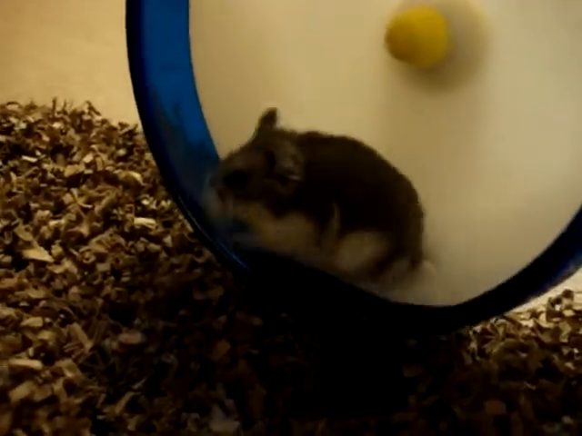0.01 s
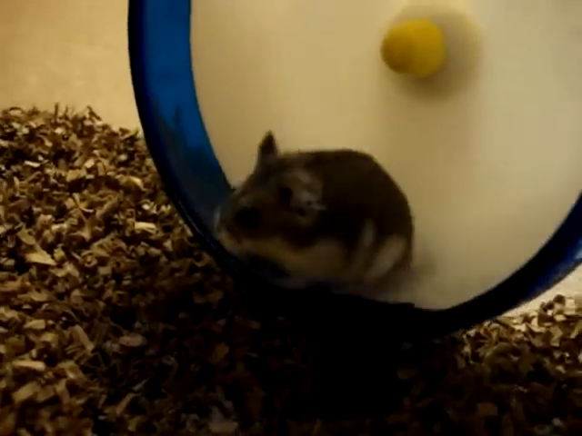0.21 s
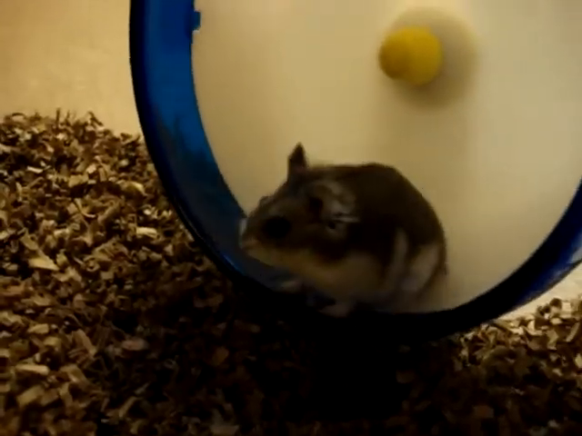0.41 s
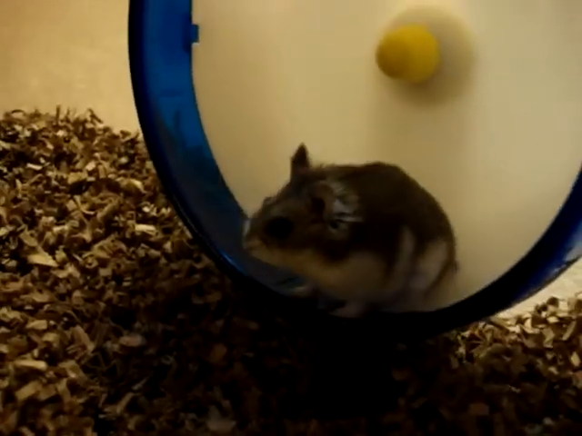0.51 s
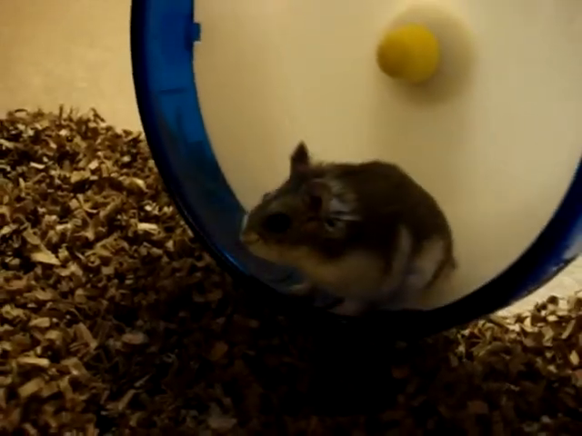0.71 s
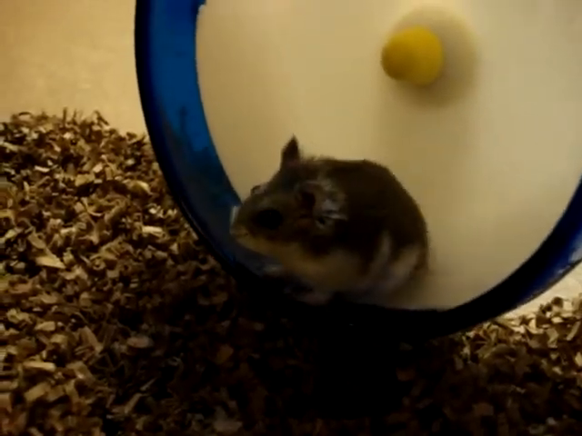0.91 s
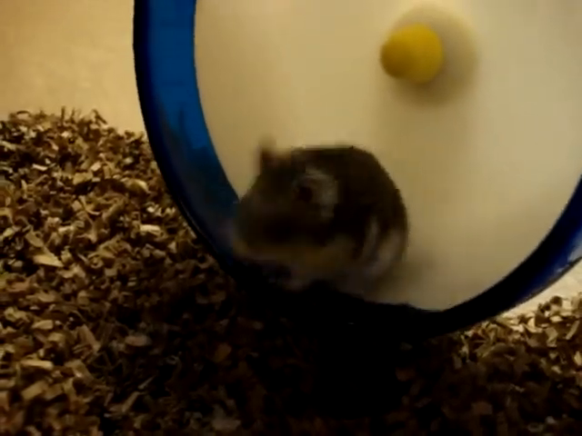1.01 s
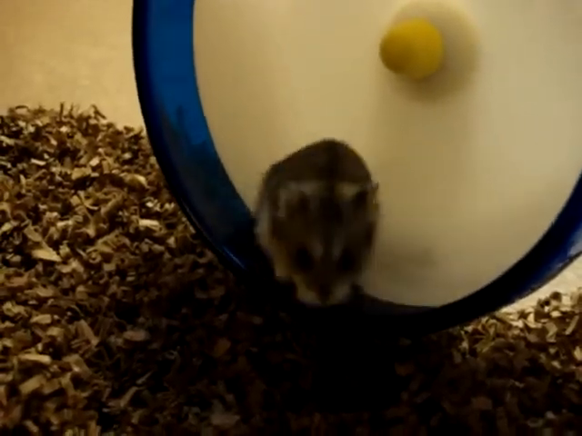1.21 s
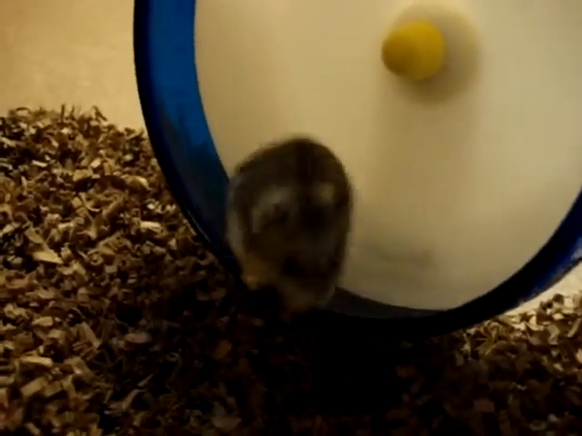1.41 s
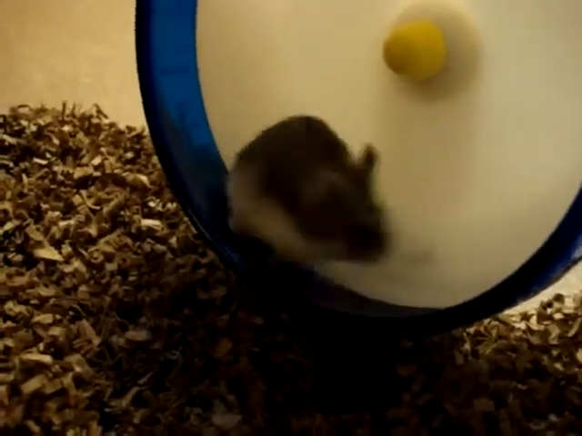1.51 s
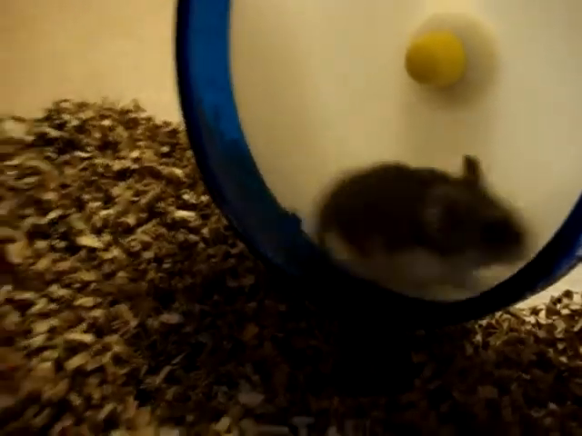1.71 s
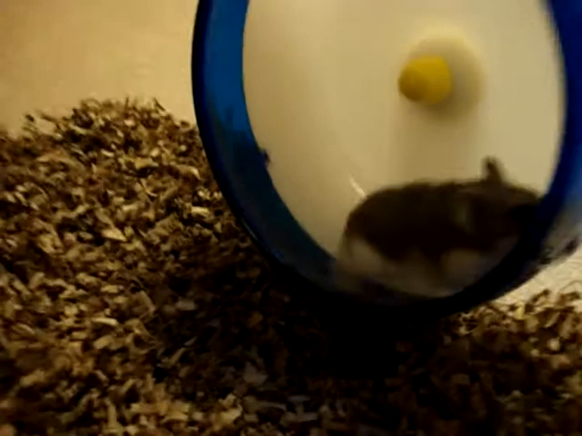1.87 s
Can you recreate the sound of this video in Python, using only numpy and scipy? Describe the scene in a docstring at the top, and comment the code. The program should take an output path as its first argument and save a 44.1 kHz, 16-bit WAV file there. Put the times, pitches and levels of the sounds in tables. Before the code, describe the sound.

A hamster's plastic exercise wheel clacks, heard close up in a small room. Soft hollow thumps come at the start and near 0.17 seconds, then a dull knock at 0.22 and a loud, bright chattering clack at 0.27 with a short room tail. Low hiss remains, with a tiny tick at 0.8 and faint thump at 1.14. From 1.6, light thumps and ticks join a swelling, humming rub.

```python
"""Indoors, close to the microphone: a hamster shifts its weight in a small plastic exercise wheel.
Paw and drum thumps are one decaying sine plus a dull noise thud; claw ticks are short noise bursts.
The loose wheel knocks, then clacks on its axle: chattering noise cracks, plastic modes, a low bump.
Near the end the animal turns round and the wheel's rub and roll, friction noise with a drum hum, swells.
Room hiss is filtered noise; its upper part dips briefly around the first knock, returning with the clack."""
import sys
import numpy as np
from scipy import signal
from scipy.fft import rfft, irfft
from scipy.io import wavfile

SR = 44100
rng = np.random.default_rng(int(sys.argv[2]) if len(sys.argv) > 2 else 0)


def store_wav(level_fs):
    """Save 16-bit WAV to argv[1]."""
    pcm = np.round(np.clip(np.atleast_2d(level_fs), -1, 1) * 32767)
    wavfile.write(sys.argv[1], SR, pcm.T.astype(np.int16))


N = 83790
T = np.arange(N) / SR


def undb(db):
    """Decibels to amplitude gain."""
    return 10 ** (np.asarray(db) / 20)


def unit(x):
    """Scale to rms 1."""
    return x / np.sqrt(np.mean(x ** 2))


def level_curve(points):
    """Gain over time from (seconds, dB) points, joined linearly in dB."""
    seconds, db = np.array(points, float).T
    return undb(np.interp(T, seconds, db))


def colour(x, points):
    """Filter by a spectrum of (Hz, dB) points, joined over log frequency; rms 1."""
    point_hz, point_db = np.array(points, float).T
    bin_hz = np.maximum(np.fft.rfftfreq(N, 1 / SR), 1)
    gain_db = np.interp(np.log(bin_hz), np.log(point_hz), point_db)
    return unit(irfft(rfft(x) * undb(gain_db), N))


def noise(points):
    """Coloured Gaussian noise of rms 1."""
    return colour(rng.standard_normal(N), points)


def lowpass(x, hz, order):
    """Butterworth low-pass."""
    return signal.sosfilt(signal.butter(order, hz, fs=SR, output="sos"), x)


def split(x, hz):
    """Zero-phase parts below and above a frequency; they sum to x."""
    bin_hz = np.fft.rfftfreq(N, 1 / SR)
    low = irfft(rfft(x) / (1 + (bin_hz / hz) ** 8), N)
    return low, x - low


def burst(start_s, attack_s, t60_s):
    """Envelope: linear attack times an exponential decay, both from the start."""
    attack = np.clip((T - start_s) / attack_s, 0, 1)
    return attack * np.exp(-np.log(1000) * np.maximum(T - start_s, 0) / t60_s)


def ring(start_s, hz, attack_s, t60_s):
    """One struck mode: a decaying sine."""
    return burst(start_s, attack_s, t60_s) * np.sin(2 * np.pi * hz * (T - start_s))


# Hiss spectrum. Each row: frequency in Hz, relative density in dB per Hz.
HISS_SPECTRUM = [(15, -49), (25, -17), (32, -10), (113, -1.5), (156, 0.5), (239, -1), (292, -3.5),
                 (482, -5.5), (836, -9), (901, -7.5), (1070, -9.5), (3580, -16.5), (10000, -24),
                 (13000, -108), (22000, -120)]
# Brief dip of the upper hiss. Each row: time in seconds, gain in dB.
HISS_DIP = [(.197, 2.5), (.203, -34), (.262, -34), (.29, 1)]
HISS_DB, DIP_ABOVE_HZ = -52.5, 440


def hiss():
    """Steady room noise; its upper part dips briefly."""
    low, high = split(noise(HISS_SPECTRUM), DIP_ABOVE_HZ)
    return undb(HISS_DB) * (low + high * level_curve(HISS_DIP))


# Rubbing of the turning wheel. Each row: time in seconds, level in dB.
ROLL_LEVEL = [(0, -59), (.15, -67.5), (.3, -90), (1.0, -73), (1.5, -67), (1.68, -60.5), (1.78, -57),
              (1.9, -51.5)]
# Friction spectrum. Each row: frequency in Hz, relative density in dB per Hz.
RUB_SPECTRUM = [(150, 12), (400, 11), (1000, -5.5), (2000, 4.5), (4000, 4.5), (7000, 4.5), (10000, -18)]
DRUM_HZ, DRUM_WIDTH_HZ = 736, 81
DRUM_RE_RUB_DB = 3


def rolling():
    """Axle friction as noise, which also drives one drum resonance into a hum."""
    friction = rng.standard_normal(N)
    rub = colour(friction, RUB_SPECTRUM)
    b, a = signal.iirpeak(DRUM_HZ, DRUM_HZ / DRUM_WIDTH_HZ, fs=SR)
    hum = unit(signal.lfilter(b, a, friction))
    return (rub + undb(DRUM_RE_RUB_DB) * hum) * level_curve(ROLL_LEVEL)


# Soft thumps of paws and of the rocking drum. Each row: start in seconds, ring level in dB,
# pitch in Hz, ring t60 in seconds, thud rms in dB relative to half the ring amplitude.
THUMPS = [(.003, -29, 802.4, .08, -8), (.0075, -28, 792.4, 0.13, -6.5), (.0205, -27, 781.5, .06, -23),
          (.105, -51.5, 780, 0.13, -18), (.159, -43, 760, 0.049, -4), (.171, -39, 960, 0.039, -19),
          (.1735, -26, 723, 0.052, -19), (.2318, -15, 777, 0.049, -10), (.2485, -20, 791, 0.033, -20),
          (.263, -23.5, 760, 0.032, -10), (.287, -16, 769, 0.078, -8.5), (1.137, -41, 820, 0.025, -5),
          (1.632, -41.5, 766, 0.14, 2), (1.728, -34, 780, 0.015, 3), (1.7307, -24, 840, 0.013, -9),
          (1.7365, -31.5, 760, 0.047, -11), (1.8215, -34.5, 773, 0.046, 0), (1.853, -44, 760, 0.13, -15),
          (1.893, -44, 920, .05, -12)]
# Thud spectrum. Each row: frequency in Hz, relative density in dB per Hz.
THUD_SPECTRUM = [(100, -26), (250, 8), (400, 0), (520, -5), (750, 12), (1000, 6.5), (1500, -5.5),
                 (2500, -10), (5000, -45), (10000, -53)]
PAW_PUSH_S, THUD_T60_S = 0.00094, 0.06


def thumps():
    """Soft blows ring only the drum's main mode, pitched by where the weight rests, with a dull thud."""
    thud_noise = noise(THUD_SPECTRUM)
    out = np.zeros(N)
    for start_s, ring_db, hz, t60_s, thud_db in THUMPS:
        mode = ring(start_s, hz, PAW_PUSH_S, t60_s)
        thud = thud_noise * burst(start_s, PAW_PUSH_S, THUD_T60_S)
        out += undb(ring_db) * (mode + undb(thud_db) * thud / 2)
    return out


# Knocks of the wheel on its axle. Each row: start in seconds, ring level in dB, crack level in dB,
# bump level in dB, low-pass corner in Hz, share of the free decay time.
KNOCKS = [(0.2248, -19.5, -17, -64, 1860, 0.57), (.2701, -17.5, -10, -21, 14200, 1.)]
# Quick contacts within one knock. Each row: delay in seconds, level in dB.
BOUNCES = [(0, -0.5), (.0034, -0.5), (.0049, -0.5), (.0082, -4.5), (0.0117, -9)]
# Crack spectrum. Each row: frequency in Hz, relative density in dB per Hz.
CRACK_SPECTRUM = [(40, -17.5), (130, -28), (300, -24.5), (520, -19.5), (750, -2), (1050, -12),
                  (1400, -10.5), (1900, -11), (2600, -6), (3500, -0.5), (4600, -0.5), (6800, -0.5),
                  (8300, -6), (10000, -16)]
# Modes of the plastic wheel. Each row: frequency in Hz, relative level in dB, free t60 in seconds.
WHEEL_MODES = [(400, -13, .13), (712, -3, .1), (763, -2, .09), (797, -5, .09), (990, -4, .1),
               (1414, -2, .115), (1588, -9, .1), (1954, -14, .11), (2462, -6, .075), (2585, -7, .07),
               (2870, -10, .07), (3380, -2, .06), (3550, 3, .058), (3838, -2, .06), (4060, -3, .06),
               (4585, 4, .04), (4742, 1, .04), (5228, 0, .033), (5645, -2, .03), (6510, -2, .025),
               (6862, 0, .025)]
CRACK_ATTACK_S, RING_RISE_S = 0.00036, 0.0049
CRACK_FREE_T60_AT_1KHZ_S, CRACK_T60_SLOPE = 0.12, 0.79  # t60 falls as Hz ** -slope
CRACK_BAND_EDGES_HZ = 1000 * 2 ** np.arange(0, 4.1, .5)
BUMP_HZ, BUMP_RISE_S, BUMP_T60_S = 36.5, .003, 0.055


def chatter(start_s, t60_s):
    """Envelope of the quick contacts, added in power."""
    power = 0
    for delay_s, db in BOUNCES:
        power = power + (undb(db) * burst(start_s + delay_s, CRACK_ATTACK_S, t60_s)) ** 2
    return np.sqrt(power)


def crack(start_s, decay_share):
    """Chattering contact noise in bands, the treble dying first."""
    rest = unit(np.tanh(0.7 * noise(CRACK_SPECTRUM)))  # tanh flattens the peaks
    out = np.zeros(N)
    for edge_hz in CRACK_BAND_EDGES_HZ:
        band, rest = split(rest, edge_hz)
        free_t60_s = CRACK_FREE_T60_AT_1KHZ_S * (edge_hz / 1000) ** -CRACK_T60_SLOPE
        out += band * chatter(start_s, decay_share * free_t60_s)
    return out


def wheel_ring(start_s, decay_share):
    """The struck wheel's plastic modes, each a decaying sine."""
    return sum(undb(db) * ring(start_s, hz, RING_RISE_S, decay_share * free_t60_s)
               for hz, db, free_t60_s in WHEEL_MODES)


def knocks():
    """The hub chatters on the axle: cracks and wheel modes, with a low bump under the clack."""
    out = np.zeros(N)
    for start_s, ring_db, crack_db, bump_db, dull_hz, decay_share in KNOCKS:
        out += undb(crack_db) * lowpass(crack(start_s, decay_share), dull_hz, order=1)
        out += undb(ring_db) * lowpass(wheel_ring(start_s, decay_share), dull_hz, order=2)
        out += undb(bump_db) * ring(start_s, BUMP_HZ, BUMP_RISE_S, BUMP_T60_S)
    return out


# Claw ticks. Each row: start in seconds, level in dB, t60 in seconds.
TICKS = [(.8030, -41.5, 0.013), (1.7033, -32.5, .018), (1.8198, -44, 0.035)]
# Tick spectrum. Each row: frequency in Hz, relative density in dB per Hz.
TICK_SPECTRUM = [(300, -26), (1200, -2), (2000, -18), (2600, 0.5), (3100, -3), (4200, 1.5), (4900, -16),
                 (10000, -23)]
TICK_ATTACK_S = 0.00036


def claws():
    """Tiny hard ticks on the plastic: noise with a sharp attack and a fast decay."""
    tick = noise(TICK_SPECTRUM)
    return sum(undb(db) * tick * burst(start_s, TICK_ATTACK_S, t60_s) for start_s, db, t60_s in TICKS)


# Reflection spectrum. Each row: frequency in Hz, relative level in dB.
ROOM_SPECTRUM = [(60, -12), (300, -5), (800, -9.5), (2000, -2), (4000, -2), (7000, -5.5), (10000, -1.5)]
EARLY_DB, EARLY_T60_S = -21.5, 0.19
LATE_DB, LATE_T60_S = -29.5, 0.64
ROOM_DELAY_S, ROOM_ATTACK_S = 0.033, 0.0017


def room(x):
    """Quick reflections from the cage and a fainter, longer room tail, as decaying noise responses."""
    response = np.zeros(N)
    for db, t60_s in [(EARLY_DB, EARLY_T60_S), (LATE_DB, LATE_T60_S)]:
        tail = noise(ROOM_SPECTRUM) * burst(ROOM_DELAY_S, ROOM_ATTACK_S, t60_s)
        response += undb(db) * unit(tail) / np.sqrt(N)  # total energy set by db
    return x + signal.fftconvolve(x, response)[:N]


def scene():
    """Blows on the wheel excite the room; friction and hiss are added without it."""
    blows = thumps() + knocks() + claws()
    return (hiss() + rolling() + room(blows))[None]


CEILING = 0.71  # microphone limit, as a share of digital full scale
TOP_HZ = 10050


def record(dry):
    """The microphone rounds the loudest peaks; the recorder cuts the top steeply."""
    rounded = CEILING * np.tanh(dry / CEILING)
    steep = signal.ellip(10, .2, 70, TOP_HZ, fs=SR, output="sos")  # order, ripple dB, stopband dB
    return signal.sosfilt(steep, rounded)


dry = scene()
out = record(dry)
store_wav(out)
```